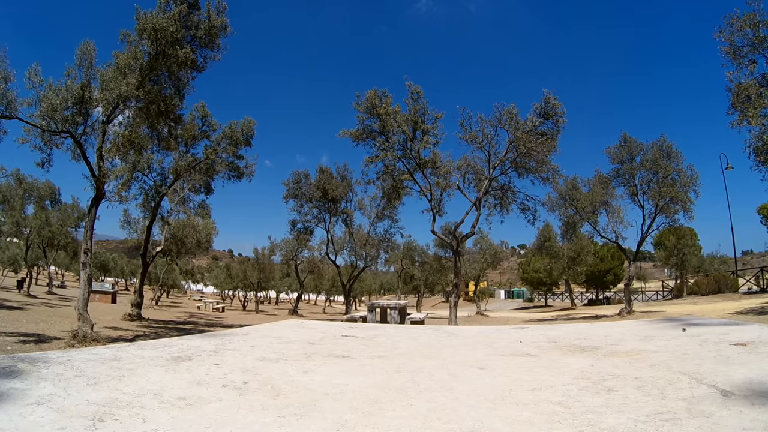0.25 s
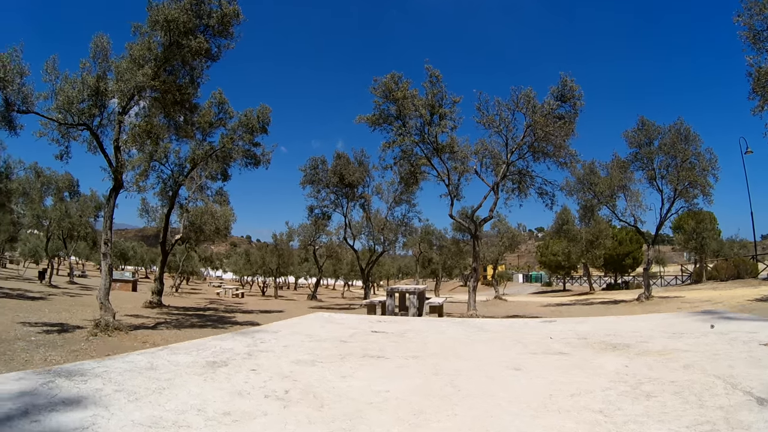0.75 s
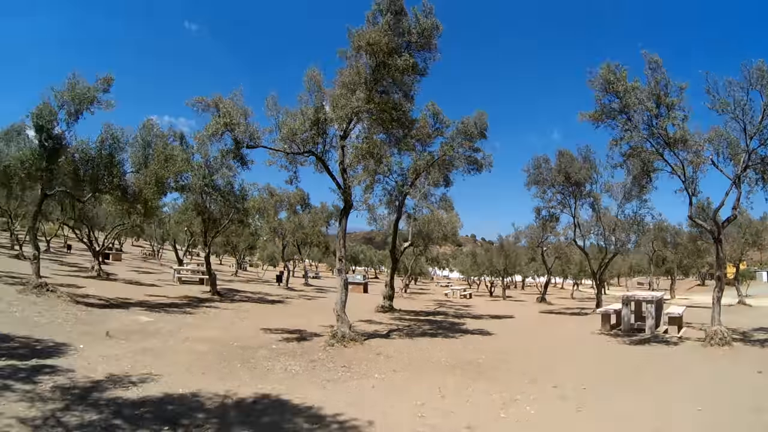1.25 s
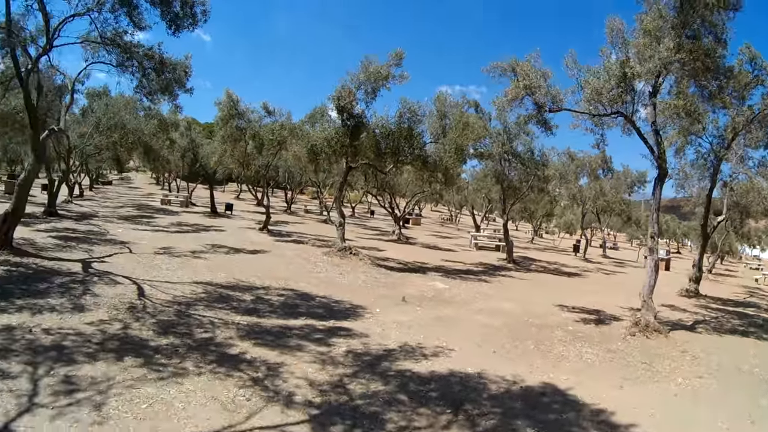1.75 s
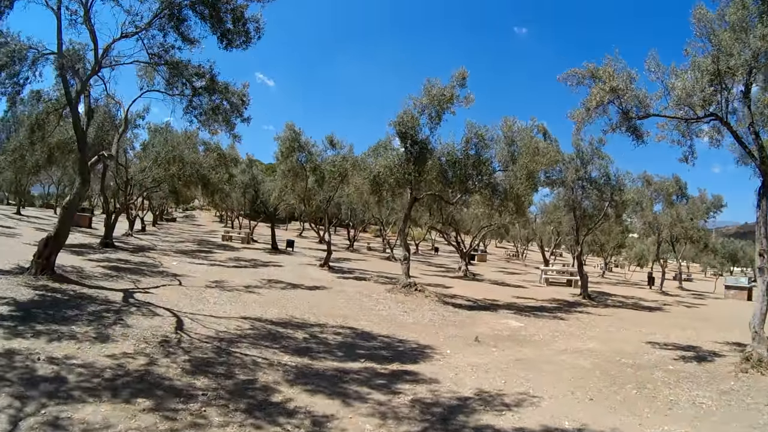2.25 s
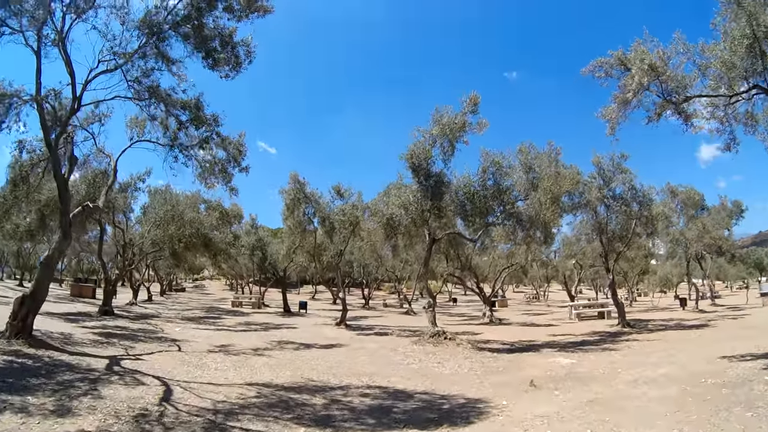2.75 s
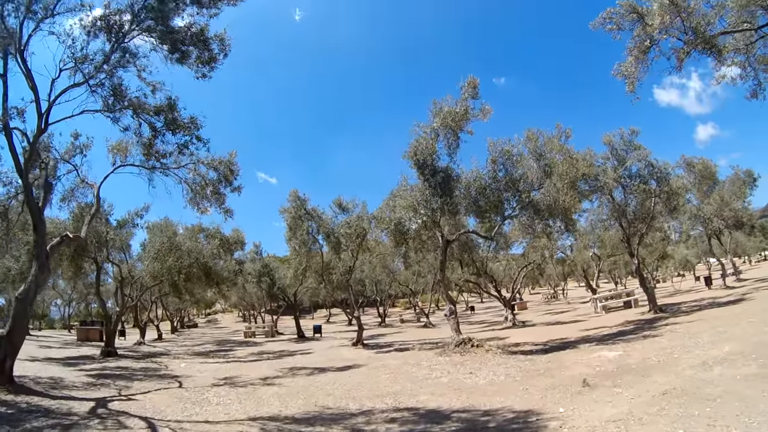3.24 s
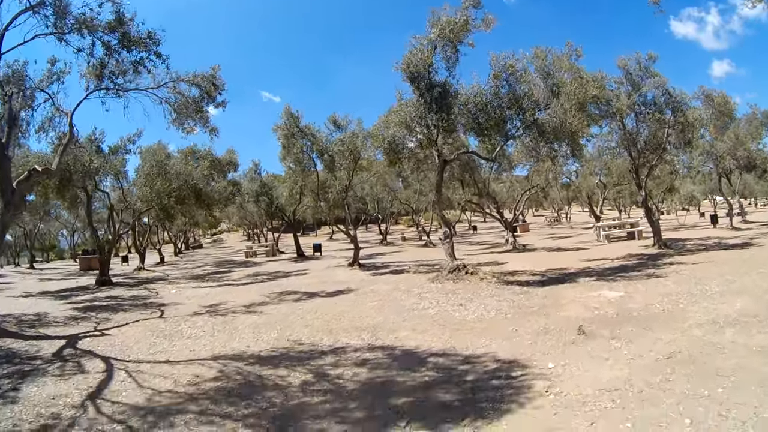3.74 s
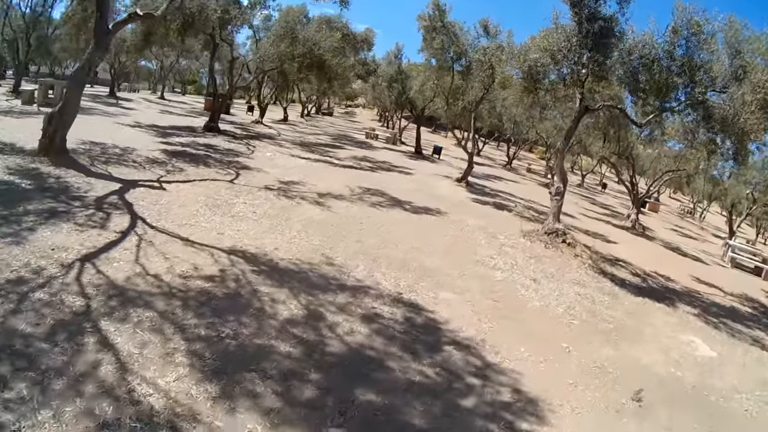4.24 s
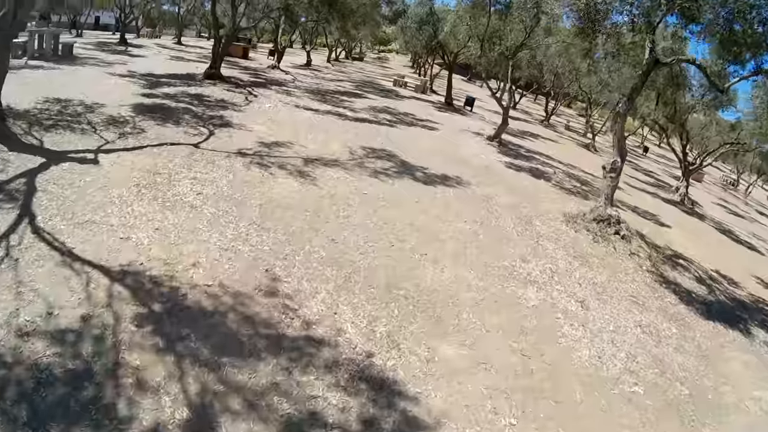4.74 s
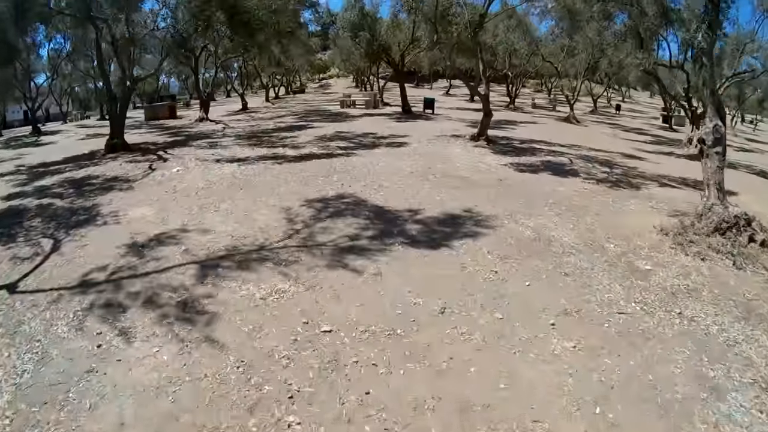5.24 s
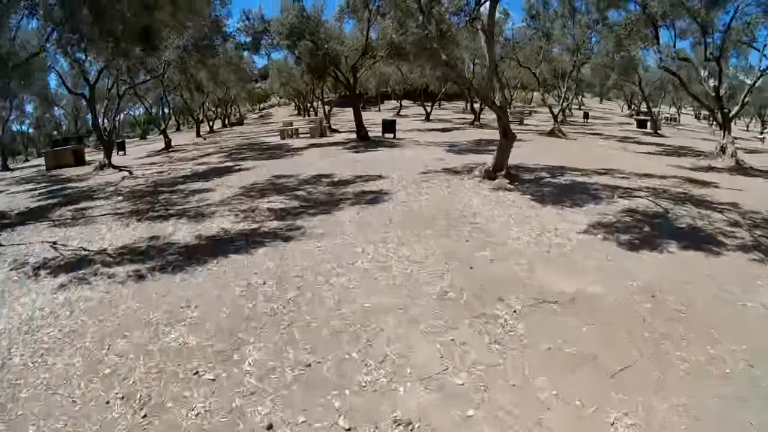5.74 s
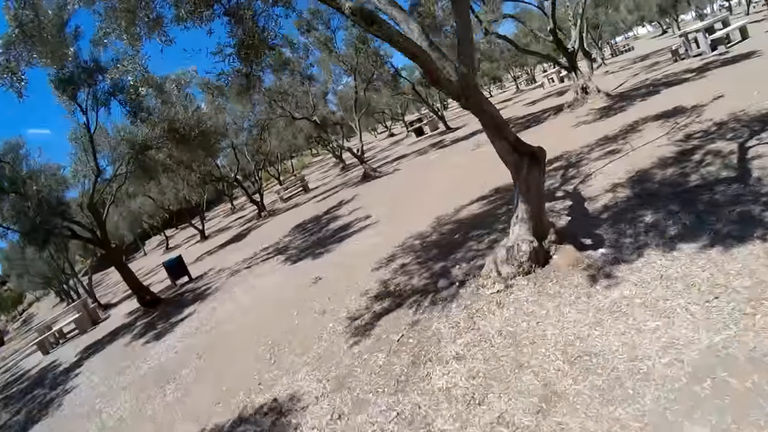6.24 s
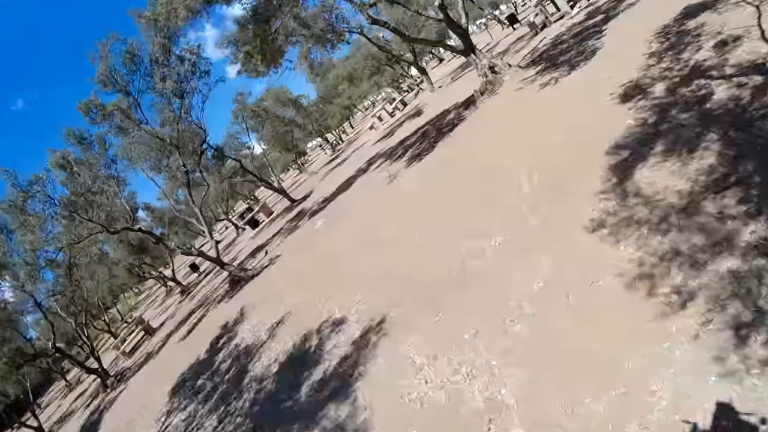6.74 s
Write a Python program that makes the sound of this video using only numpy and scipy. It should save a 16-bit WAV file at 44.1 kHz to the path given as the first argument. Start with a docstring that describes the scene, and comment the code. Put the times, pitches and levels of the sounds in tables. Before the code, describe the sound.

The microphone rides on the frame of a small four-rotor drone outdoors, very close and dry. At 0 s the blades turn slowly: a low, fairly quiet hum under soft airy hiss. From about 0.3 to 0.9 s they spool up more than an octave into a loud, buzzing whir, with rushing prop wash and a burst of overload crackle until 1.1 s. From 1.2 to 3 s the flight hum wavers, rotors of slightly different pitch beating roughly, with mostly single snappy pops that grow frequent. The pitch lifts around 3 to 3.4 s, dips, and surges near 3.8 s with thick crackle. It eases, then surges again at 4.5 s. From 5.2 to 6 s dense crackle covers the straining rotors; a brief dip near 6.1 s leads to another harsh, crackling surge until 6.8 s. The buzz continues to an abrupt end at 7 s. Everything is boxy and dull on top.

```python
"""A small four-rotor drone spools up, lifts off and flies, with the microphone on its frame.
First come low rotor hums, sine tones at multiples of the blade rate, over a hiss of prop wash (shaped noise).
As the rotors speed up they beat against each other, and the overdriven input pops: short pulses while lows fold.
An early burst of crackle gives way to mostly single pops, and late in the flight the crackle turns dense again.
Throughout, a narrow notch and a steep low-pass colour everything.
"""
import sys
import numpy as np
from scipy import signal
from scipy.io import wavfile
from scipy.ndimage import uniform_filter1d

SR = 44100
rng = np.random.default_rng(int(sys.argv[2]) if len(sys.argv) > 2 else 0)


def boost_factor(decibels):
    """Convert a level in decibels to a linear amplitude factor."""
    exponent = np.asarray(decibels, float) / 20
    return 10 ** exponent


def to_wav(sig):
    """Store sig (one row per channel, or 1-D mono) as 16-bit WAV at the path in sys.argv[1].

    Samples outside -1..1 are clipped; the rate is SR.
    """
    pcm = np.clip(np.atleast_2d(sig), -1, 1) * 32767
    pcm = np.round(pcm).astype(np.int16)
    wavfile.write(sys.argv[1], SR, pcm.T)  # frames by channels


N = 308259  # length in samples
CRUISE_HZ = 400  # blade rate at cruise speed


def evened(x):
    """Scales a signal to rms 1."""
    return x / np.sqrt(np.mean(x ** 2) + 1e-20)


def drift(length, hz):
    """Slow random wandering of rms 1: noise with everything faster than hz filtered away."""
    low_pass = signal.butter(4, hz, fs=SR, output="sos")
    return evened(signal.sosfilt(low_pass, rng.standard_normal(length)))


# how the nearest rotor's overtones swell as the flight attitude changes:
# (t/s, second tone's extra level/dB, third to fifth tones' extra level/dB)
NEAR_TIMBRE = [(0, 5.5, 6), (.6, -7, 2), (1.44, -6.5, -23), (1.52, 2.5, -2), (4.5, 0.5, -0.5),
               (5.35, -5, 3.5), (6.6, -1, 6), (6.99, -14, 2.5)]
# hum of the nearest rotor at cruise speed: (t/s, level/dB)
NEAR_LEVEL = [(0, -21.5), (.55, -17.5), (.7, -19.5), (1.399, -20.5), (1.55, -16), (2.032, -15.5),
              (2.151, -17), (4.253, -14.5), (4.7, -17), (5.1, -16), (5.4, -22.5), (5.85, -17), (6.18, -19),
              (6.5, -24.5), (6.75, -19.5), (6.99, -17)]


def near_rotor():
    """The rotor nearest the microphone, at the throttle's speed; gives its tone and blade angle."""
    hz = throttle_hz(np.arange(N) / SR)
    return rotor(hz, np.transpose(NEAR_LEVEL), sharp_db=14.0, timbre=NEAR_TIMBRE)


# a mostly slower rotor that steers on its own: (t/s, blade rate f/Hz, level/dB at cruise speed)
SLOW_ROTOR = [(0, 166.9, -25.5), (.25, 191.1, -30), (0.421, 246.5, -16.5), (.58, 256.6, -12),
              (.68, 303.6, -20.5), (0.799, 348.4, -15.5), (1, 335.7, -17), (1.271, 347, -17),
              (1.401, 333.7, -14.5), (1.521, 355.5, -20.5), (1.62, 333, -19), (1.899, 345, -22),
              (2, 369, -19.5), (2.297, 387, -22), (2.599, 374.3, -21), (2.799, 379.8, -17.5),
              (3.399, 368.9, -23), (3.5, 346.6, -21.5), (3.65, 377.2, -16), (4.251, 361.8, -22.5),
              (4.35, 338, -19), (4.501, 380.3, -26.5), (4.87, 314.1, -22.5), (5.149, 345, -19),
              (5.299, 385, -20), (5.601, 439.4, -22.5), (5.93, 451.6, -24), (6.132, 373, -25.5),
              (6.33, 424, -31)]


def slow_rotor():
    """A rotor with a speed curve of its own, so that its hum beats against the near one."""
    s, hz, db = np.transpose(SLOW_ROTOR)
    return rotor(np.interp(np.arange(N) / SR, s, hz), (s, db), sharp_db=11.5)[0]


# a mostly faster rotor, heard in the turns: (t/s, speed as a share of the near rotor's [1], level/dB at cruise speed)
FAST_ROTOR = [(.45, 1.11, -23), (1.0, 1.006, -25), (1.2, 0.92, -51), (2.5, 1.062, -48), (2.85, 1.15, -25.5),
              (3.02, 1.065, -30), (3.36, 1.085, -23), (3.5, 1.05, -49.5), (4.2, 1.05, -34),
              (4.45, 1.073, -29), (4.7, 1.12, -25.5), (5.17, 1.144, -23.5), (5.45, 1.21, -26),
              (5.8, 1.195, -30.5), (6.15, 1.19, -23), (6.45, 1.16, -23.5), (6.7, 1.18, -26),
              (6.85, 1.18, -22.5), (6.99, 1.12, -22)]


def fast_rotor():
    """A rotor that follows the throttle, mostly a little above the near rotor's speed."""
    return throttle_follower(FAST_ROTOR, sharp_db=10.5)


# a slower rotor, heard in late turns: (t/s, speed as a share of the near rotor's [1], level/dB at cruise speed)
FAR_ROTOR = [(5.4, .8, -24), (5.9, .775, -28), (6.2, .77, -22), (6.4, .76, -23.5), (6.7, .78, -31),
             (6.8, .87, -25.5), (6.99, .83, -16.5)]


def far_rotor():
    """A rotor that follows the throttle well below the near rotor's speed, with duller overtones."""
    return throttle_follower(FAR_ROTOR, sharp_db=4.5)


def throttle_follower(rows, sharp_db):
    """Tone of a rotor whose speed is a changing share of the near rotor's."""
    t = np.arange(N) / SR
    s, share, db = np.transpose(rows)
    return rotor(np.interp(t, s, share) * throttle_hz(t), (s, db), sharp_db)[0]


# tones of one rotor, two blades a turn: (multiple of the blade rate [1], relative level/dB)
OVERTONES = [(.5, -23.5), (1, 1.5), (2, -5), (3, -13), (4, -18),
             (5, -24.5)] + [(k, -16 - 1.44 * k) for k in range(6, 14)]
HUM_DB_PER_OCTAVE = 18  # a faster blade hums louder


def rotor(hz, level, sharp_db, timbre=((0, 0, 0),)):
    """Blade tones on a speed that the flight controller keeps nudging; gives the tone and the blade angle."""
    s, db = level
    t = np.arange(N) / SR
    load = load_db()
    nudge = .003 * boost_factor(load + 33) ** .25  # share of the speed, larger under load
    angle = 2 * np.pi * np.cumsum(hz * (1 + nudge * drift(N, hz=20.9))) / SR

    # 60 ms fades, except where the curve reaches the start or the end of the scene
    since_start = t - s[0] + (s[0] == 0)
    until_end = s[-1] - t + (s[-1] > 6.9)
    fade = np.clip(np.minimum(since_start, until_end) / .06, 0, 1)

    hum_db = np.interp(t, s, db) + HUM_DB_PER_OCTAVE * np.log2(hz / CRUISE_HZ)
    bite_db = 0.42 * hum_db + 0.91 * load + sharp_db  # overtones grow with the load on the blades
    when, second_db, upper_db = np.transpose(timbre)
    tone = np.zeros(N)
    for multiple, over_db in OVERTONES:
        # higher tones waver more
        level_db = over_db + np.minimum(multiple, 10) * .4 * drift(N, hz=30)
        level_db += hum_db if multiple == 1 else bite_db
        if 2 <= multiple <= 5:
            level_db += np.interp(t, when, second_db if multiple == 2 else upper_db)
        tone += boost_factor(level_db) * np.sin(multiple * angle + 2 * np.pi * rng.random())
    tone += motor_whine(hz, angle, bite_db)
    return np.sqrt(2) * fade * tone, angle


def motor_whine(hz, angle, bite_db):
    """Faint whine of the motor windings, a high multiple of the blade rate, loudest where the frame rings."""
    multiple, peak_hz, fall_db_per_khz = 21, 7440, 8
    off_khz = abs(multiple * hz - peak_hz) / 1000
    whine_db = -27 + bite_db - fall_db_per_khz * off_khz + 3.4 * drift(N, hz=8)
    return boost_factor(whine_db) * np.sin(multiple * angle)


# speed of the near rotor, set by the throttle: (t/s, blade rate f/Hz)
THROTTLE = [(0, 176.5), (.1, 155.1), (.3, 191.7), (.45, 255.2), (.55, 332), (.85, 416), (1, 431.3),
            (1.12, 411.6), (1.2, 428.8), (1.3, 421.3), (1.55, 366.5), (1.95, 393.8), (2.03, 429.7),
            (2.18, 396.4), (2.55, 389.8), (2.8, 408.4), (3.0, 445.9), (3.36, 448), (3.55, 385.8),
            (3.8, 457), (3.92, 401), (4.25, 374.5), (4.4, 391), (4.47, 437.8), (4.56, 434.7), (4.7, 358.7),
            (4.95, 377.7), (5.12, 366.3), (5.3, 415.3), (5.55, 411.2), (5.8, 430.9), (5.95, 415.7),
            (6.05, 359.5), (6.18, 341.7), (6.32, 406), (6.7, 439), (6.78, 393), (6.9, 370), (6.99, 382.6)]


def throttle_hz(s):
    """Blade rate of the near rotor at the given times, before the controller's nudges."""
    return np.interp(s, *np.transpose(THROTTLE))


# blade load, which steers the level of the broad wash: (t/s, level/dB)
LOAD = [(0.201, -41), (0.451, -32.5), (0.72, -26), (1.651, -31.5), (2.1, -31), (3.05, -31.5), (3.549, -32),
        (3.821, -29), (4.15, -31.5), (4.8, -33), (5.399, -26), (5.9, -29.5), (6.141, -32.5), (6.619, -25),
        (6.99, -29.5)]


def load_db():
    """How hard the blades bite the air, sample by sample."""
    return np.interp(np.arange(N) / SR, *np.transpose(LOAD))


# single pops of the overdriven input: (t/s, swing before the ceiling [full scale], relative height of the snap [1])
POPS = [(0.553, .56, 0.12), (.61, 0.52, 0.09), (0.686, .58, 0.1), (0.867, 0.55, 1), (.919, 0.23, 0.74),
        (1.028, 0.3, 0.33), (1.055, 0.26, 0.52), (1.085, 0.37, 0.94), (1.136, .11, 0.41),
        (1.275, 0.24, 0.3), (1.311, 0.63, 0.089), (1.369, .07, 0.58), (1.412, 0.47, 0.42),
        (1.577, 0.26, 0.55), (1.646, 0.24, 0.12), (1.771, 0.493, 0.63), (1.888, .53, 0.078),
        (2.033, 1.1, 0.36), (2.138, .5, 1), (2.324, .32, 0.6), (2.352, 0.34, 0.13), (2.404, 0.64, 0.24),
        (2.493, 1.1, 0.22), (2.559, 0.49, 0.52), (2.669, 0.49, 0.6), (2.735, 0.75, 0.5), (2.788, .75, 0.59),
        (2.866, .3, 0.55), (2.895, .8, 0.43), (2.914, .5, .6), (2.934, 0.5, 0.82), (3.014, .7, 0.57),
        (3.040, .6, .5), (3.080, .55, .4), (3.155, .55, .6), (3.205, .6, 0.67), (3.264, .6, 0.45),
        (3.296, .8, 0.46), (3.384, .55, 0.45), (3.448, 0.41, 0.48), (3.592, 0.74, 0.22), (3.781, 0.35, 0.2),
        (3.818, .6, 0.62), (3.959, .5, 0.54), (3.974, .6, .7), (4.020, 0.7, 0.61), (4.078, 0.2, 0.9),
        (4.178, .4, .2), (4.195, .7, .38), (4.456, .35, 0.25), (4.484, 1.1, 0.71), (4.521, .59, 0.75),
        (4.582, .69, 0.13), (4.925, 0.4, 0.83), (5.031, 0.4, 0.39), (5.042, 0.75, 0.099), (5.09, .57, 0.99),
        (5.153, .3, 0.077), (5.202, .4, 0.26), (6.232, 0.23, 0.047), (6.785, 0.61, 0.27),
        (6.835, 0.31, 0.5)]
# stretches of dense crackle: (start t/s, end t/s, pops a second [1/s], relative size of swing [1])
CRACKLE = [(.7, 1.106, 100, 0.25), (1.999, 2.182, 58, 0.69), (2.98, 3.41, 32, 1), (3.661, 3.92, 144, 0.64),
           (5.232, 6.018, 190, 0.43), (6.26, 6.78, 208, 0.49), (6.89, 6.99, 60, 0.32)]


def pop_pulses():
    """Places the single pops, lesser snaps crowding round them, and random crackle; gives one-sample pulses."""
    swings, snaps, ticks = np.zeros((3, N))
    s, swing, snap = np.transpose(POPS)
    at = np.round(s * SR).astype(int)
    way = np.sign(rng.random(len(s)) - .5)
    swings[at], snaps[at] = swing * way, snap * way

    # lesser snaps: their rate and size both follow the swing of the single pop
    reach_s, per_s_of_swing, share_of_swing = 0.008, 330, 0.5
    stutters = [(when - reach_s, when + reach_s, per_s_of_swing * size, share_of_swing * size)
                for when, size, _ in [(row[0], row[1], row[2]) for row in POPS]]
    rate, height = np.zeros((2, N))
    for start, end, per_s, size in stutters + CRACKLE:
        span = slice(round(start * SR), round(end * SR))
        rate[span], height[span] = per_s, size

    edges = np.ravel([row[:2] for row in CRACKLE]) * SR
    crackling = np.searchsorted(edges, np.arange(N)) % 2  # 1 inside a stretch of crackle
    chance, side, large, sharp = rng.random((N, 4)).T
    fires = height * (chance < rate / SR) * np.sign(side - .5)
    swings += fires * 1.3 * large ** 2 * np.where(crackling, 1, 0.38)  # lesser snaps swing less
    snaps += fires * 1.28 * sharp
    ticks += fires * crackling * .5 * (1 - sharp)  # in dense crackle some snaps are twice as quick
    return swings, snaps, ticks


def pops(air):
    """The overdriven input: a quick snap one way, a longer swing the other way, while the low band folds over."""
    fold_depth, fold_half_ms, fold_below_hz = 1.8, 1.13, 540  # depth 2 = fully upside down
    ceiling = .9  # of full scale
    swings, snaps, ticks = pop_pulses()
    ms = np.arange(-300, 301) / SR * 1000
    bump = np.cos(np.pi / 2 * np.clip(ms / 1.48, -1, 1)) ** 2
    u = (ms + 0.44) / 0.29  # the snap comes just before the swing
    flick = 2.8 * u * np.exp(-u ** 2 / 2)

    fold_shape = np.cos(np.pi / 2 * np.clip(ms / fold_half_ms, -1, 1))
    folding = signal.oaconvolve(1. * (swings != 0), fold_shape, "same")
    low = signal.sosfiltfilt(signal.butter(2, fold_below_hz, fs=SR, output="sos"), air)
    folded = air - low * fold_depth * np.clip(folding, 0, 1)

    jolt = signal.oaconvolve(swings, bump, "same")
    jolt += signal.oaconvolve(snaps, flick, "same")
    jolt += signal.oaconvolve(ticks, flick[::2], "same")
    return folded + ceiling * np.tanh(jolt / ceiling)


# colour of the prop wash through the frame: (f/Hz, relative level/dB per Hz)
WASH = [(150, -30), (400, -7.5), (700, -7), (1100, -4.5), (2100, -8), (2800, -17), (3800, -21),
        (4500, -25.5), (5200, -21), (7000, -29.5), (9300, -31), (11500, -62)]


def prop_wash(angle):
    """Turbulent hiss with drifting patches and gusts, chopped by each passing blade."""
    frames, hz = N // 128 + 5, np.fft.rfftfreq(512, 1 / SR)
    a, b, patches = rng.standard_normal((frames, 257, 3)).T
    # patches spread over 8 frequency bins and 12 frames
    patches = evened(uniform_filter1d(uniform_filter1d(patches, size=8, axis=0), size=12, axis=1))
    f, db = np.transpose(WASH)
    colour_db = np.interp(np.log(hz + 1), np.log(f), db)[:, None]
    load = np.pad(load_db()[::128], (0, frames), "edge")[:frames]
    colour_db = colour_db + 0.13 * np.log2(hz / 2000 + 1)[:, None] * (load + 33)  # brighter under load
    spectrum = (a + 1j * b) * boost_factor(colour_db + 1.3 * patches)
    hiss = signal.istft(spectrum, nperseg=512, noverlap=384)[1][:N]
    gusts = boost_factor(1.2 * drift(N, hz=43.6))
    hiss *= gusts * (1 + 0.34 * np.cos(angle))
    return boost_factor(load_db() + 5.5) * evened(hiss)


HOUSING_HZ = 1637  # the housing rings here with hiss and blade tones alike


def housing_hiss(angle):
    """Hiss ringing in the housing, a resonance that is broad at idle and narrow in flight."""
    cavity = signal.iirpeak(HOUSING_HZ, 5.5, SR)
    broad = signal.lfilter(*cavity, rng.standard_normal(N))
    narrow = signal.lfilter(*cavity, broad)
    focus = np.clip(throttle_hz(np.arange(N) / SR) / CRUISE_HZ, 0, 1)
    ringing = focus * evened(narrow) + (1 - focus) * evened(broad)
    level = boost_factor(-21.5 + 0.18 * load_db() + 1.7 * drift(N, hz=18))  # follows the load only a little
    return level * evened(ringing * (1 + 0.32 * np.cos(angle)))


def housing_tones(hum):
    """Blade tones ringing in the housing, picked out by a resonance."""
    return boost_factor(1.5) * signal.lfilter(*signal.iirpeak(HOUSING_HZ, 4, SR), hum)


def scene():
    """Four rotors and their wash pass the wind filter of the input; the pops arise after it."""
    near, angle = near_rotor()
    hum = near + slow_rotor() + fast_rotor() + far_rotor()
    hum = hum + housing_tones(hum)
    hiss = prop_wash(angle) + housing_hiss(angle)
    wind_filter = signal.butter(6, 150, "high", fs=SR, output="sos")
    air = signal.sosfilt(wind_filter, hum + hiss)
    return pops(air)[None]


def top_cut(x):
    """Nothing passes above the cut-off."""
    return signal.sosfilt(signal.butter(12, 15700, fs=SR, output="sos"), x)


def record(dry):
    """A narrow notch, overload above a knee, and a steep low-pass that leaks a little treble with two nulls."""
    x = signal.lfilter(*signal.iirnotch(700, 14, SR), dry)
    knee, room = .6, .33  # of full scale: where overload begins, and how far above it the sound can rise
    over = np.maximum(abs(x) - knee, 0)
    x = np.sign(x) * (np.minimum(abs(x), knee) + room * np.tanh(over / room))
    passed = signal.oaconvolve(x, signal.firwin(46, 5000, fs=SR)[None], "same")
    x = passed + boost_factor(-21.5) * (x - passed)
    for null_hz in (6520, 7500):
        x = signal.lfilter(*signal.iirnotch(null_hz, 8, SR), x)
    return top_cut(x)


dry = scene()
out = record(dry)
to_wav(out)
```